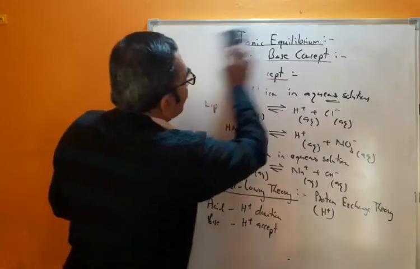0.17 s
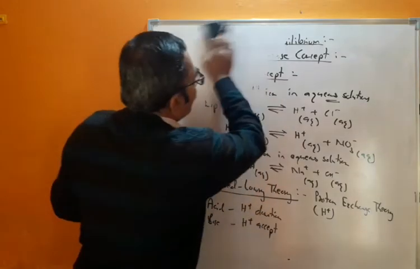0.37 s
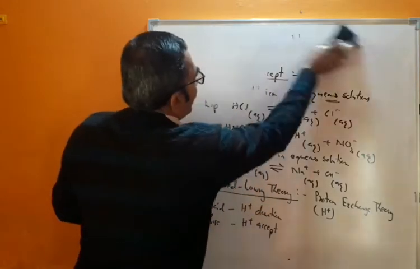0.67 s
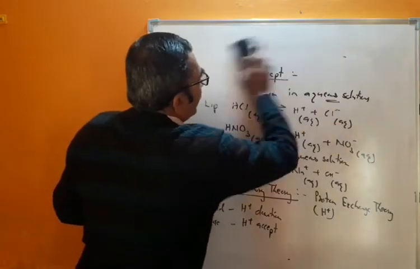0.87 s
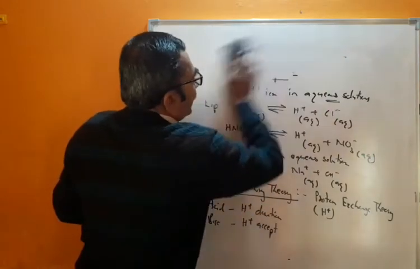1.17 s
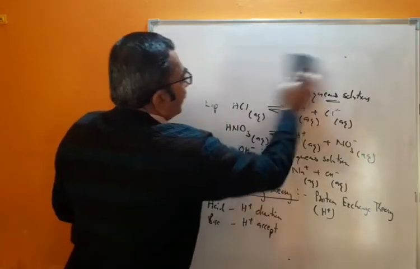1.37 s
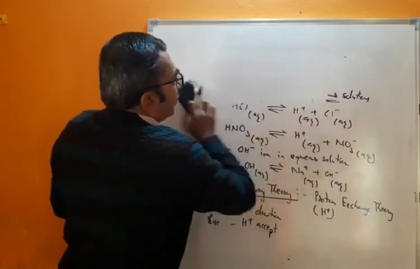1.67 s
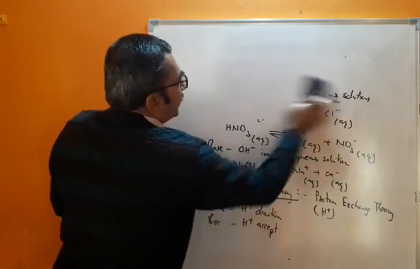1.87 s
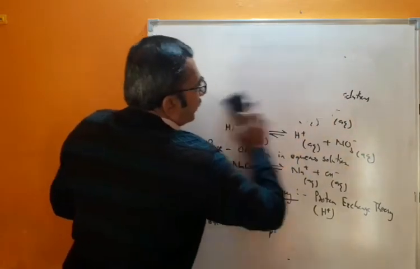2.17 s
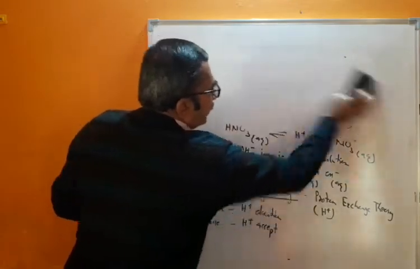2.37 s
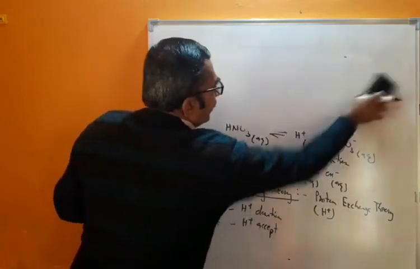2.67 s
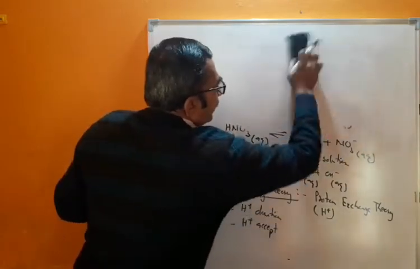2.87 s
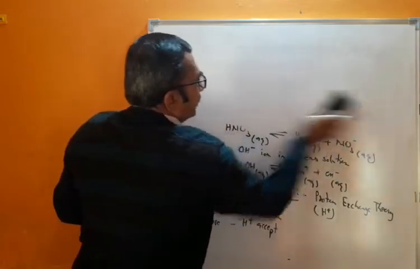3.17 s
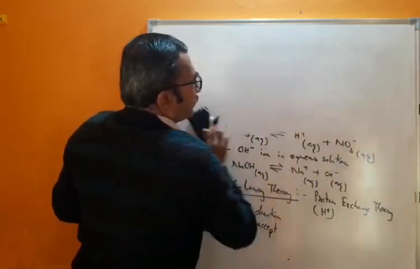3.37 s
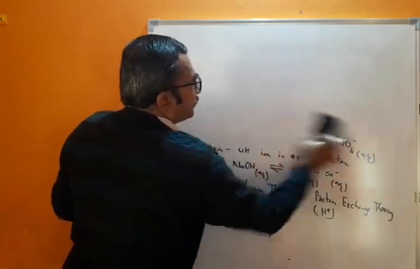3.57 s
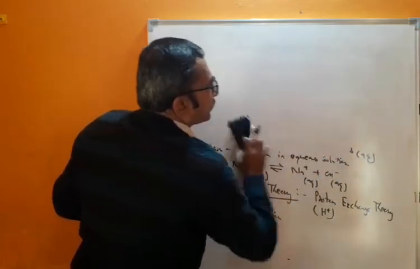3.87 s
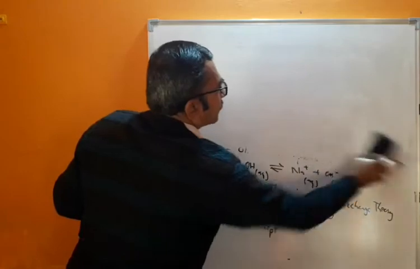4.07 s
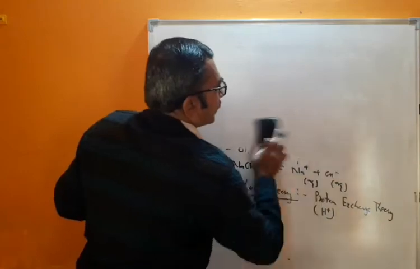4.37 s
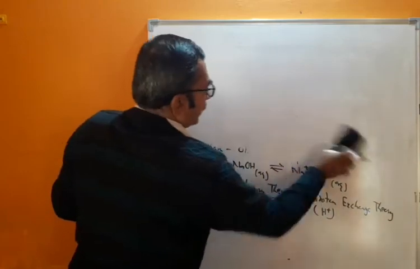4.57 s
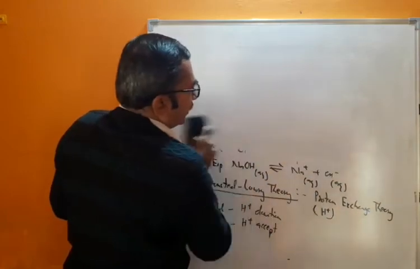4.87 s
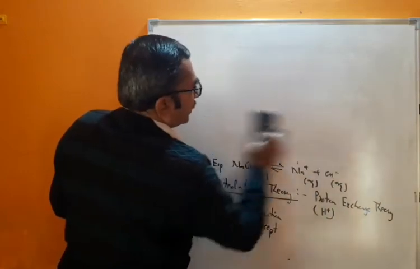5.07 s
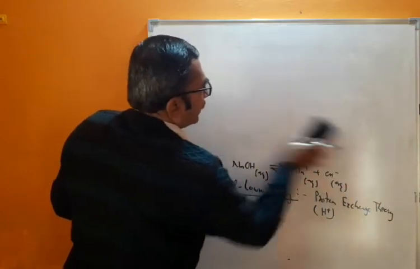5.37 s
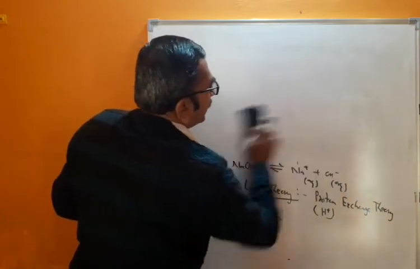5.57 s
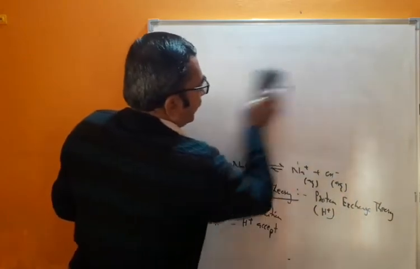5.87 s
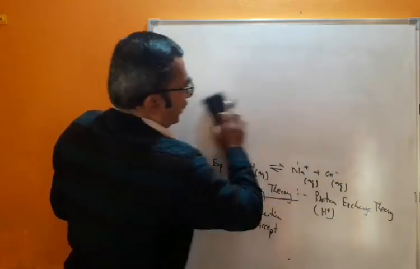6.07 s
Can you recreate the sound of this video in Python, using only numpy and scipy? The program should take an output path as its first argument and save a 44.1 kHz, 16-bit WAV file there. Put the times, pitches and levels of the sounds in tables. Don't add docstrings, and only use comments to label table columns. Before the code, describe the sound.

A felt duster rubs a whiteboard in quick back-and-forth dry hisses over faint outside rumble, with one hollow knock midway.

```python
import sys
import numpy as np
from scipy import signal
from scipy.fft import rfft, irfft, next_fast_len
from scipy.io import wavfile

SR = 44100
rng = np.random.default_rng(int(sys.argv[2]) if len(sys.argv) > 2 else 0)


def wav_out(sig):
    wavfile.write(sys.argv[1], SR, np.round(np.clip(np.atleast_2d(sig).T, -1, 1) * 32767).astype(np.int16))


def gain_from_decibels(decibels):
    exponent = np.asarray(decibels, float) / 20
    return 10 ** exponent


N = 274302

# (turn time [s], top level [dB], level left at turn [dB], lean [-1 late..1 early])
STROKES = [(-0.042, -56.5, -59, 0.25), (0.145, -50, -55, -0.011), (0.286, -54, -53, 0.3),
           (0.447, -46, -54, -0.16), (0.682, -53, -51, -0.47), (0.875, -48, -50, -0.15),
           (1.046, -48.2, -51, -0.19), (1.271, -44.5, -50.5, -0.15), (1.487, -49, -51, -0.28),
           (1.711, -44.5, -53.0, -0.13), (1.981, -50.5, -51.5, -0.34), (2.171, -46.5, -52.5, -0.27),
           (2.401, -53.5, -51.4, -0.054), (2.555, -50, -53.5, 0.056), (2.743, -52, -50, -0.12),
           (2.919, -46, -53, -0.26), (3.134, -47.5, -51.5, 0.41), (3.435, -46, -51.5, 0.16),
           (3.704, -49.3, -53, -0.69), (3.896, -45.5, -53, -0.35), (4.189, -49, -54, -0.33),
           (4.44, -48.5, -52.5, -0.035), (4.659, -49, -53.5, -0.17), (4.947, -45.5, -55, -0.49),
           (5.311, -49.5, -56.3, -0.59), (5.539, -48, -53, -0.41), (5.785, -49.2, -53.5, 0.052),
           (6.083, -60.5, -55, -0.11), (6.236, -30.2, -59.5, -0.0)]
# (time [s], fibre tip level [dB], panel level [dB])
REACH = [(0, -1.0, 1.6), (.55, -.5, 2.5), (.9, 0.5, 2), (1.35, -0.7, 0.2), (1.6, 1, 1), (1.85, -0.7, 2),
         (2.1, 0.8, 0.7), (2.45, 0.5, -0.6), (3.0, -0.7, -1), (3.3, 0.5, 1.3), (3.9, 0.5, -1), (4.35, 1, 0),
         (4.65, 0.2, -0.2), (5.3, -1, -1.2), (6.22, -0.7, -1.2)]
# (frequency [Hz], density [dB per Hz])
FELT_COLOUR = [(410, -53), (700, -10), (757, -8.5), (908, -8.5), (1030, -7.5), (1370, -3.5), (1510, -2),
               (2250, -2), (4310, -3), (7150, -7), (10300, -7.5), (13200, -12), (15600, -21)]
# (frequency [Hz], width [Hz], level [dB])
BOARD_PEAKS = [(1090, 170, 5), (1210, 84, 0), (9960, 780, 3)]

# (loudest time [s], engine level [dB], tyre level [dB], fade [dB/s])
PASSES = [(0.0, -64, -64, 3), (.31, -56, -61, 36), (.43, -66, -60, 11.5), (.67, -55, -61.5, 54),
          (1.05, -57, -60.5, 15), (1.37, -58, -60, 47), (1.6, -60, -66, 9), (1.97, -56, -71, 40),
          (2.26, -59.5, -64, 22), (2.55, -62, -67, 9), (2.74, -66, -66.5, 12), (2.98, -59, -57, 20),
          (3.19, -59.5, -58.5, 26), (3.38, -56.5, -57.5, 36), (3.67, -57, -73, 31), (3.93, -63, -78, 31),
          (4.12, -56.5, -63.5, 17), (4.3, -56.5, -64, 50), (4.56, -54.5, -62.5, 58),
          (4.83, -58.5, -66.5, 21), (5.13, -51.5, -61.5, 14), (5.47, -53, -60.5, 16.5),
          (6.22, -53.5, -66, 9)]
# (frequency [Hz], width [Hz], level [dB])
ROOM_MODES = [(81, 7, -14), (125.6, 15, -7.5), (153.3, 4.4, -7.5), (245, 41, -10.5), (277.7, 13, -10.5)]
# (frequency [Hz], density [dB per Hz])
ENGINE_COLOUR = [(15, -55), (25, -21), (54, -16), (69, -31), (86, -12), (103, -5.5), (156, -6.5),
                 (188, -1.5), (273, -6.5), (328, -12), (400, -17), (520, -18), (880, -120)]
# (frequency [Hz], density [dB per Hz])
TYRE_COLOUR = [(120, -11), (200, 0), (630, -4), (1110, -0.5), (1360, 0), (4190, -2), (7800, -29.5),
               (10100, -7), (12700, -13), (15600, -10.5)]

# (time [s], pitch of the fifth order [Hz])
REVS = [(0.0, 110.2), (0.07, 105.8), (1.25, 100.6), (1.59, 108.8), (2.08, 99.3), (3.31, 104.7),
        (3.41, 108.7), (3.79, 101.2), (4.42, 98.5), (5.01, 107.1), (5.4, 101.2), (6.22, 101.6)]
# (time [s], level of all but the fifth order [dB])
IDLE_LEVEL = [
    (0, -83),
    (4.1, -79),
    (4.5, -73),
    (4.75, -65),
    (4.95, -63),
    (5.25, -74),
    (5.45, -63),
    (5.8, -70.5),
    (6.22, -62),
]
# (multiple [1], level [dB])
IDLE_ORDERS = [(2, -12.5), (4, -5.5), (6, 4), (7, -1), (8, -7), (9, -8.5), (11, -8), (12, -5), (13, -3),
               (14, -8.5)]
# (middle time [s], length [s], level [dB])
BOOMS = [(.12, 0.12, -66), (0.423, .17, -63), (0.73, 0.41, -58.5), (1.023, 0.26, -58), (1.554, 0.18, -65),
         (1.743, .12, -74), (2.0, 0.18, -66), (2.135, 0.12, -62), (2.365, 0.34, -57.5), (2.7, 0.6, -65),
         (3.0, 0.2, -64), (3.25, 0.28, -60.5), (3.486, 0.32, -64), (3.68, 0.28, -61), (3.927, .25, -64),
         (4.197, 0.34, -65), (4.473, .3, -57.5), (4.7, 0.58, -61), (4.947, .3, -55.5), (5.17, 0.22, -55),
         (5.31, .2, -54), (5.56, 0.31, -52.5), (5.805, 0.56, -55.5), (6.038, 0.53, -57.5)]

# (time [s], pitch [Hz], level [dB])
WHINE = [(0, 1090, -65), (.4, 1075, -64.5), (.75, 1062, -67), (1.0, 1090, -64.5), (1.2, 1100, -68),
         (1.33, 1120, -60), (1.6, 1055, -72), (1.95, 1072, -65), (2.2, 1080, -61.5), (2.5, 1050, -66.5),
         (2.8, 1090, -67), (3.1, 1080, -79), (6.22, 1080, -85)]
# (time [s], pitch [Hz], level [dB])
SQUEAL = [
    (1.7, 11500, -85),
    (1.9, 11450, -72),
    (2.06, 11480, -68),
    (2.13, 11590, -62),
    (2.5, 11580, -56.5),
    (2.76, 11570, -61),
    (2.86, 11500, -65),
    (2.95, 11450, -83),
]

# (time [s], peak level [dB], hardness [dB per octave])
KNOCKS = [
    (3.376, -53, 7),
    (3.386, -34.5, -3),
    (3.408, -41.5, 4.5),
]
# (frequency [Hz], level [dB], T60 [s])
KNOCK_MODES = [(165, -15, .2), (245, 1, 0.16), (270, -11, .2), (350.5, -3.5, .18), (454, -11, .1),
               (533, -2, 0.11), (830, -6, 0.083), (1050, -13, .15), (1100, -1.5, 0.18), (1230, 1, .09),
               (1242, 5.5, .12), (1437, 1, .1), (1740, -1.5, .08), (1855, -2, .09), (1930, -3, 0.078)]
# (low edge [Hz], high edge [Hz], level [dB], T60 [s])
RATTLE = [
    (150, 400, -47, .4),
    (330, 950, -46, .26),
    (1020, 1600, -43, .2),
    (1600, 2050, -39.5, .12),
]

# (frequency [Hz], density [dB per Hz])
PARTING_COLOUR = [(30, -7), (150, -15.5), (400, -12), (750, -9), (1100, -11), (4000, -2.5), (8000, -9),
                  (15500, -8.5)]
# (time [s], low edge [Hz], high edge [Hz], level [dB])
PARTINGS = [(.525, 6300, 7600, -63), (.99, 8300, 9700, -62), (.99, 14500, 15700, -72),
            (1.57, 4200, 5100, -58), (1.57, 8900, 10300, -62), (1.965, 13000, 15700, -72),
            (2.195, 8900, 10400, -70), (3.265, 8900, 10300, -62), (3.705, 9600, 11300, -72),
            (4.77, 4200, 5800, -58), (4.77, 13100, 14600, -68), (5.19, 7600, 9100, -63),
            (5.19, 13100, 14600, -69), (5.885, 4600, 5770, -62), (5.935, 4220, 5150, -60),
            (5.935, 12400, 13900, -70)]

USUAL_DB = -48


def rms_one(x):
    return x / np.sqrt(np.mean(x ** 2) + 1e-20)


def in_time(rows):
    s, *columns = np.transpose(rows)
    return [np.interp(np.arange(N) / SR, s, column) for column in columns]


def colour(x, points):
    hz, db = np.transpose(points)
    size = next_fast_len(N)
    grid = np.arange(size // 2 + 1) * SR / size + 1
    gain = gain_from_decibels(np.interp(np.log(grid), np.log(hz), db))
    return rms_one(irfft(rfft(x, size) * gain, size)[:N])


def drift(rate_hz):
    every, settle = 40, 2000
    r = np.exp(-2 * every * np.pi * rate_hz / SR)
    white = rng.standard_normal(N // every + settle + 2)
    slow = signal.lfilter([1], [1, -2 * r, r * r], white)[settle:]
    return np.interp(np.arange(N) / every, np.arange(len(slow)), rms_one(slow))


def resonance(x, hz, width):
    r = np.exp(-np.pi * width / SR)
    poles = [1, -2 * r * np.cos(2 * np.pi * hz / SR), r * r]
    return signal.lfilter(np.array([1, 0, -1]) * (1 - r * r) / 2, poles, x)


def band(x, low_hz, high_hz):
    return signal.sosfilt(signal.butter(2, [low_hz, high_hz], "band", fs=SR, output="sos"), x)


def hand(shape, lean_share=1.0, follows=0.79, turn_db=0.0):
    t = np.arange(N) / SR
    turn, top_db, left_db, lean = np.transpose(STROKES)
    k = np.clip(np.searchsorted(turn, t) - 1, 0, len(turn) - 2)
    along = np.clip((t - turn[k]) / np.diff(turn)[k], 0, 1)
    along = along + np.clip(lean_share * lean[k], -1, 1) * along * (1 - along)
    speed = abs(np.sin(np.pi * along))
    swing = gain_from_decibels(USUAL_DB + follows * (top_db[k] - USUAL_DB)) * speed ** shape
    return np.hypot(swing, gain_from_decibels(np.interp(t, turn, left_db) + turn_db))


def duster(catches_per_s=9000, spread_db=2.0, patchy_db=0.82):
    tip_db, panel_db = in_time(REACH)
    rub = hand(1.09, turn_db=-1.3)
    brush = hand(1, lean_share=0.57, follows=0.5, turn_db=-3.5) * gain_from_decibels(tip_db)
    drive = hand(0.59, lean_share=0.75, follows=0.19, turn_db=2.5) * gain_from_decibels(panel_db - 5.5)

    caught = rng.random(N) < catches_per_s / SR
    sizes = gain_from_decibels(spread_db * rng.exponential(1, N)) * rng.choice([-1, 1], N)
    slips = colour(rms_one(caught * sizes) + 1.87 * rng.standard_normal(N), FELT_COLOUR)
    for hz, width, db in BOARD_PEAKS:
        slips = slips + (gain_from_decibels(db) - 1) * resonance(slips, hz, width)

    panel = band(band(slips, 430, 2040), 710, 11000) * drive * gain_from_decibels(patchy_db * drift(15))
    pad = band(slips, 2700, 6490) * rub * gain_from_decibels(patchy_db * drift(5.2))
    tips = band(slips, 8400, 22000) * brush * gain_from_decibels(-3 + patchy_db * drift(2.6))
    finest = band(slips, 11040, 21500) * gain_from_decibels(-7) * brush * (brush / gain_from_decibels(USUAL_DB)) ** 1.2
    return gain_from_decibels(2.0) * (panel - pad + tips + finest)


def traffic():
    every = 100
    s, engine_db, tyre_db, fade = np.transpose(PASSES)[:, :, None]
    since = np.arange(0, N + every, every) / SR - s

    def follow(peak_db, rest_db, rise_db_per_s):
        passes = peak_db + np.minimum(rise_db_per_s * since, -fade * since)
        level = np.maximum(rest_db, passes.max(axis=0))
        return np.interp(np.arange(N) / every, np.arange(len(level)), level)

    return follow(engine_db, -61.5, 60), follow(tyre_db, -74, 148)


def street():
    engine_db, tyre_db = traffic()
    modes = np.zeros(N)
    for hz, width, db in ROOM_MODES:
        modes += gain_from_decibels(db) * rms_one(resonance(rng.standard_normal(N), hz, width))
    rumble = 0.94 * modes + 0.48 * colour(rng.standard_normal(N), ENGINE_COLOUR)
    wash = colour(rng.standard_normal(N), TYRE_COLOUR)
    passing = gain_from_decibels(tyre_db + 13.5) * band(wash, 313, 1030)
    steady = gain_from_decibels(-67.5) * band(wash, 950, 9000)
    return gain_from_decibels(engine_db) * rumble + passing + steady


def booming(rest_db=-87):
    t = np.arange(0, N + 100, 100) / SR
    power = gain_from_decibels(2 * rest_db)
    for s, length, db in BOOMS:
        swell = np.cos(np.pi * np.clip((t - s) / length, -.5, .5))
        power = power + gain_from_decibels(2 * db) * swell ** 2
    return np.interp(np.arange(N) / SR, t, np.sqrt(power))


def idle(flutter_db=3):
    fifth_hz, = in_time(REVS)
    level_db, = in_time(IDLE_LEVEL)
    phase = 2 * np.pi * np.cumsum(fifth_hz / 5) / SR
    boom = np.sqrt(2) * booming() * np.sin(5 * phase)
    orders = np.zeros(N)
    for k, db in IDLE_ORDERS:
        flutter = gain_from_decibels(db + flutter_db * drift(0.66))
        orders += flutter * np.sin(k * phase + 2 * np.pi * rng.random())
    return boom + gain_from_decibels(level_db) * orders


def far_tone(rows, width, shift_hz=0.0):
    hz, db = in_time(rows)
    turn = np.exp(2j * np.pi * np.cumsum(hz + shift_hz) / SR)
    return gain_from_decibels(db) * ((drift(width) + 1j * drift(width)) * turn).real


def whine():
    return gain_from_decibels(1.5) * far_tone(WHINE, 27)


def squeal(split_hz=85):
    return gain_from_decibels(-1.0) * far_tone(SQUEAL, 58, split_hz) + gain_from_decibels(-6) * far_tone(SQUEAL, 58, -split_hz)


def knock():
    out = np.zeros(N)
    s, peak_db, hardness = np.transpose(KNOCKS)
    at = np.round(s * SR).astype(int)
    for hz, level_db, t60 in KNOCK_MODES:
        chance_db = rng.normal(0, 1.5, len(at))
        clicks = np.full(N, 1e-18)
        clicks[at] = gain_from_decibels(peak_db + hardness * np.log2(hz / 800) + level_db - 10.5 + chance_db)
        r, w = gain_from_decibels(-60 / (t60 * SR)), 2 * np.pi * hz / SR
        out += signal.lfilter([0, np.sin(w)], [1, -2 * r * np.cos(w), r * r], clicks)
    return out


def rattle(rise_cycles=1.2):
    since = np.arange(N) / SR - KNOCKS[0][0]
    white = rng.standard_normal(N)
    ring = np.zeros(N)
    for low_hz, high_hz, db, t60 in RATTLE:
        rise = np.minimum(abs(since) * low_hz / rise_cycles, 1)
        ring += gain_from_decibels(db - 60 * abs(since) / t60) * rise * rms_one(band(white, low_hz, high_hz))
    return (since > 0) * ring


def room(x, t60_s=0.56, wall_cut_hz=3000):
    out = np.zeros(N)
    dull = np.exp(-2 * np.pi * wall_cut_hz / SR)
    lags = (rng.uniform(.012, .04, size=10) * SR).astype(int)
    for k, lag in enumerate(lags):
        loop, state = x.copy(), [0.]
        gain = gain_from_decibels(-60 * lag / SR / t60_s)
        for i in range(lag, N, lag):
            back, state = signal.lfilter([gain * (1 - dull)], [1, -dull], loop[i - lag:i], zi=state)
            loop[i:i + lag] += back[:N - i]
        out += (loop - x) * (-1) ** k
    return out


def partings():
    t, white = np.arange(N) / SR, rng.standard_normal(N)
    side = gain_from_decibels(-79.0) * colour(rng.standard_normal(N), PARTING_COLOUR)
    for s, low_hz, high_hz, db in PARTINGS:
        near = slice(round((s - .03) * SR), round((s + .03) * SR))
        steep = signal.butter(8, [low_hz, high_hz], "band", fs=SR, output="sos")
        swell = np.cos(np.pi / 2 * np.clip((t[near] - s) / 0.0053, -1, 1))
        side[near] += gain_from_decibels(db + 9.5) * swell * rms_one(signal.sosfilt(steep, white[near]))
    return side


def scene():
    rub = duster()
    outside = street() + idle() + whine() + squeal()
    blow = band(band(knock() + rattle(), 140, 2600), 100, 2800)
    echoes = room(gain_from_decibels(-18.5) * rub + gain_from_decibels(-15) * blow)
    mono = rub + blow + echoes + outside
    return np.array([mono, mono])


def top_cut(x):
    return signal.sosfilt(signal.butter(12, 15730, fs=SR, output="sos"), x)


def record(dry):
    mix = dry + partings() * [[1], [-1]]
    return top_cut(mix)


dry = scene()
out = record(dry)
wav_out(out)
```